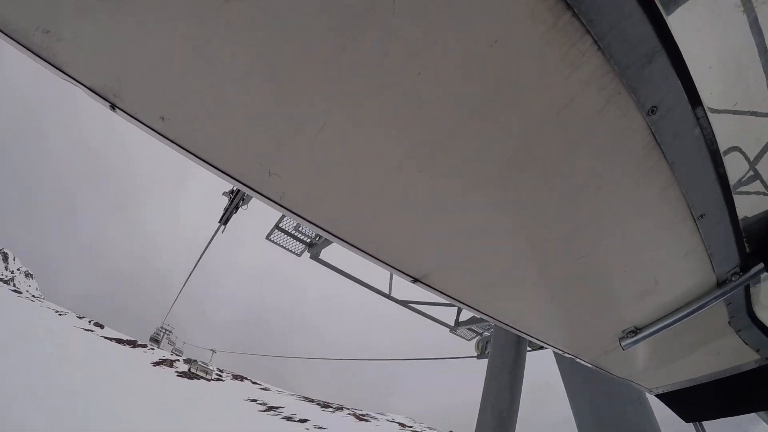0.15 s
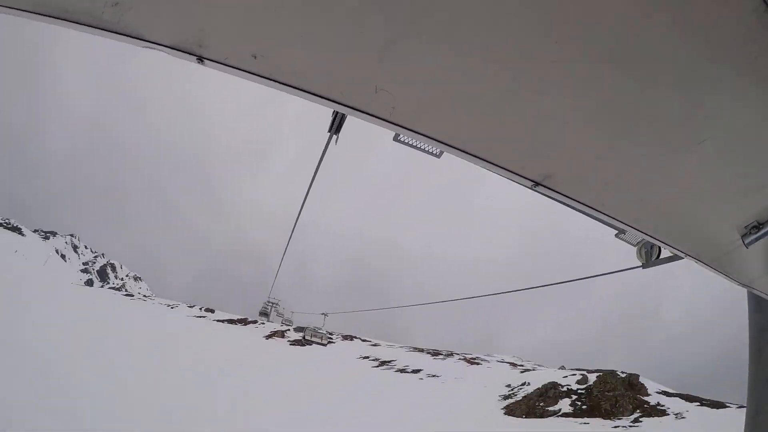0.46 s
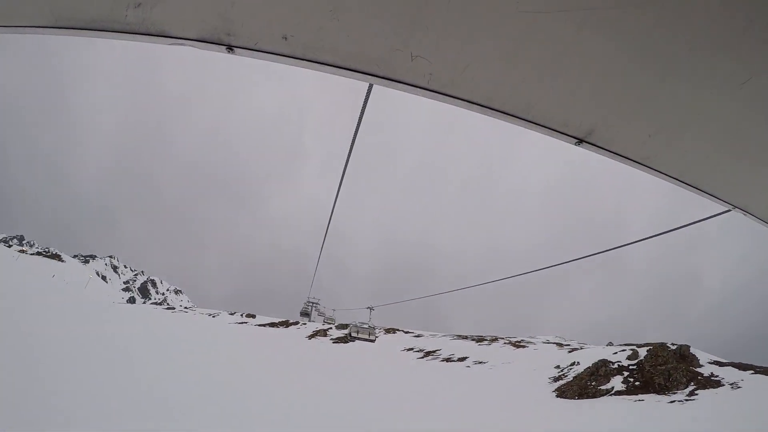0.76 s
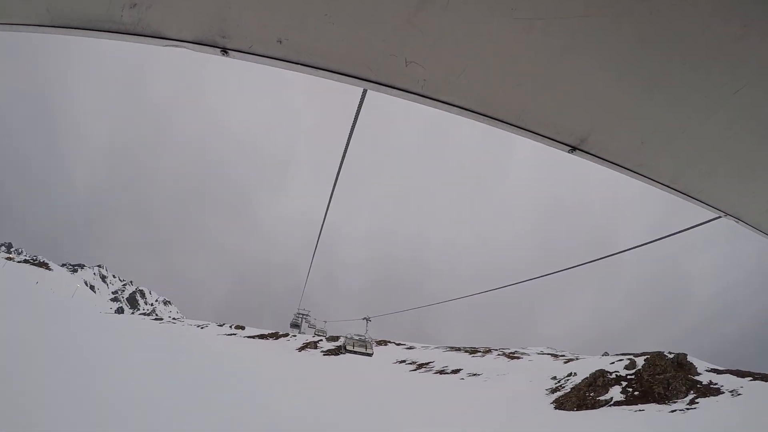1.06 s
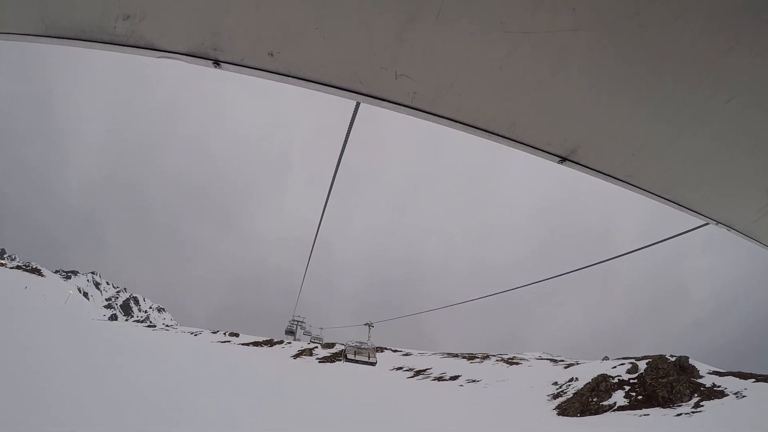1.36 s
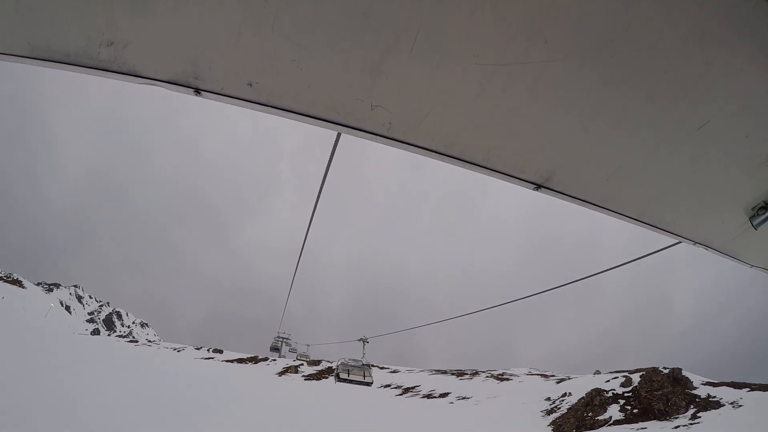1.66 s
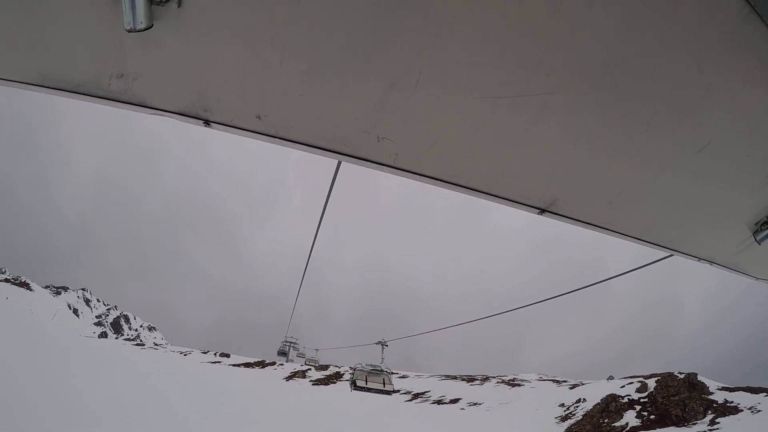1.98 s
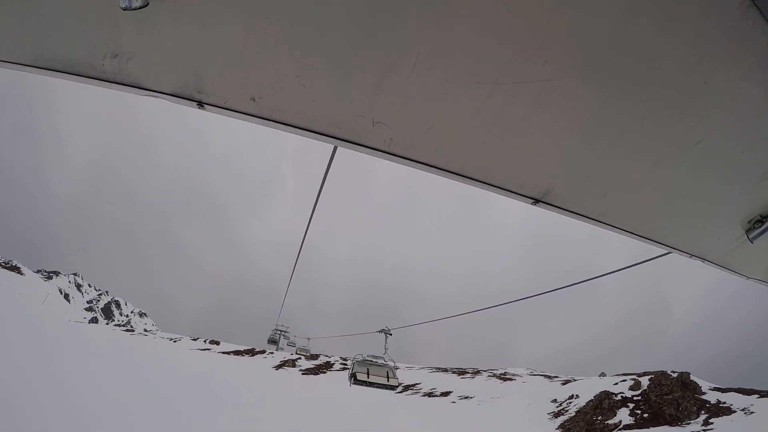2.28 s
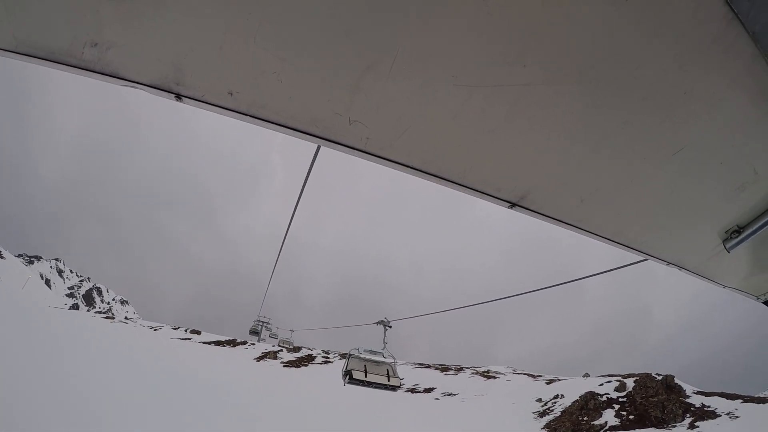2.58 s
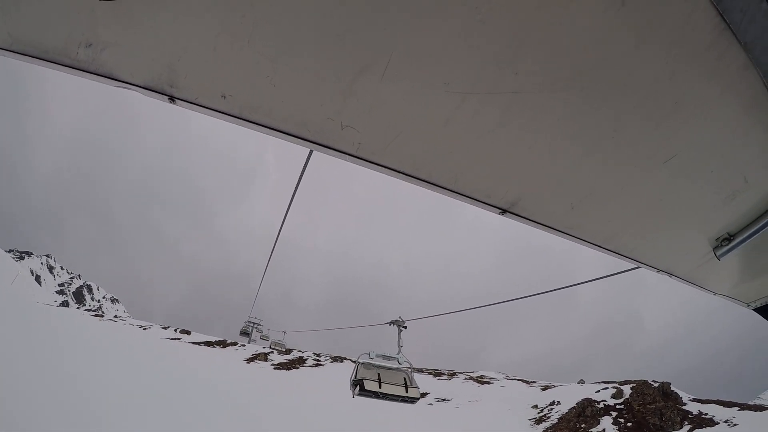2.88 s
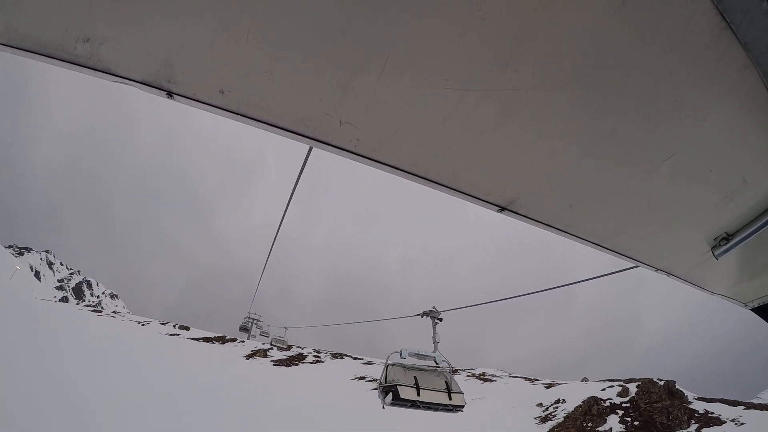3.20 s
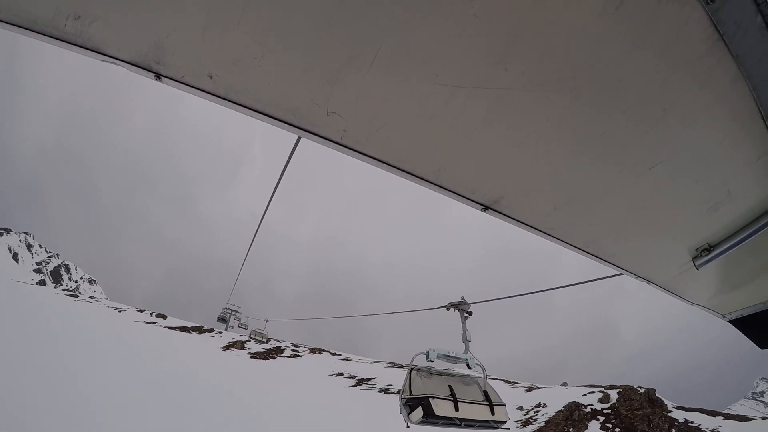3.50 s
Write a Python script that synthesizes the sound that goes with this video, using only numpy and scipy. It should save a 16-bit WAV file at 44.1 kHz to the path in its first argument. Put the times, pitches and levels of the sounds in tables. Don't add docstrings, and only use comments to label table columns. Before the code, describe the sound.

A chairlift chair rides over tower wheels with deep shuddering rumble, rapid metallic knocks and bright rattles, then calms to a low cable hum with faint squeaky taps; outdoors, small camera mounted on the chair.

```python
import sys
import numpy as np
from scipy import signal
from scipy.fft import rfft, irfft
from scipy.io import wavfile
from scipy.ndimage import uniform_filter1d

SR = 44100
rng = np.random.default_rng(int(sys.argv[2]) if len(sys.argv) > 2 else 0)


def ratio_of_db(decibels):
    return 10 ** (np.asarray(decibels, float) / 20)


def to_wav(sig):
    pcm = np.clip(np.atleast_2d(sig), -1, 1) * 32767
    pcm = np.round(pcm).astype(np.int16)
    wavfile.write(sys.argv[1], SR, pcm.T)


N = 160965


def evened(x):
    return x / np.sqrt(np.mean(x ** 2) + 1e-20)


def read(points, hz):
    f, value = np.transpose(points)
    return np.interp(np.log(hz + 1), np.log(f + 1), value)


def curve(rows, column):
    rows = np.array(rows)
    return np.interp(np.arange(N) / SR, rows[:, 0], rows[:, column])


def add(mix, s, sound):
    part = mix[..., round(s * SR):][..., :sound.shape[-1]]
    part += sound[..., :part.shape[-1]]


def colour(x, db_of):
    size = x.shape[-1]
    return irfft(rfft(x) * ratio_of_db(db_of(np.fft.rfftfreq(size, 1 / SR))), size)


def resonate(x, hz, width):
    turn = np.exp(2j * np.pi * hz * np.arange(x.shape[-1]) / SR)
    r = np.exp(-np.pi * width / SR)
    return 2 * (turn * signal.lfilter([1 - r], [1, -r], x / turn + 1e-18)).real


def drift(rate_hz):
    control_hz = 60
    count = int(N / SR * control_hz) + 2
    t = np.arange(count) / control_hz
    slow = sum(np.sin(2 * np.pi * (f * rate_hz * t + rng.random())) for f in np.geomspace(.1, 1, num=16))
    return np.interp(np.arange(N) / SR, t, evened(slow))


# t/s, level/dB
SHUDDER_LEVEL = [(0, -12.5), (.3, -13), (.48, -13.5), (.65, -13), (1.33, -15), (1.67, -20), (1.86, -14.5),
                 (1.94, -23.5), (2.05, -19.5), (2.32, -28), (2.48, -16), (2.62, -22.5), (2.74, -29),
                 (3.15, -25), (3.65, -29.5)]
# f/Hz, width/Hz, level/dB
SWING_MODES = [(22.5, 4.6, -5.5), (30.2, 3.95, 5), (41.83, 7.1, 0.5), (53.4, 5.9, -3), (65.14, 10.21, -6.5)]


def shudder():
    t = np.arange(N) / SR
    modes = 0
    for hz, width, db in SWING_MODES:
        strength = ratio_of_db(db + 5.3 * drift(7.0))
        wander = np.cumsum(1.4 * width * drift(14.0)) / SR
        modes = modes + strength * np.sin(2 * np.pi * (hz * t + wander))
    body = evened(np.tanh(0.4 * evened(modes)))
    loud = np.sqrt(uniform_filter1d(body ** 2, size=8000) + 0.23)
    return ratio_of_db(curve(SHUDDER_LEVEL, 1) + 2.06) * body / loud


# t/s, frame drone level/dB, fittings buzz level/dB
WHEEL_CONTACT = [(0, -24, -34.5), (.36, -25.5, -34), (.39, -28, -42), (.44, -30.5, -31), (.59, -24, -39.5),
                 (.64, -24.5, -29.5), (.8, -26, -36), (1.17, -26, -42), (1.25, -30.5, -44),
                 (1.355, -33, -53), (1.385, -41, -58), (1.72, -39, -58), (1.84, -33.5, -55),
                 (1.97, -47, -61), (2.6, -45, -59.5), (2.75, -53.5, -82), (3.37, -44.5, -60),
                 (3.65, -54, -74)]
# f/Hz, level/dB, t60/s
FRAME_MODES = [(114.7, -3, 0.29), (158, 1.5, 0.095), (200.6, -0.5, 0.28), (250, 0, 0.11), (272, -4.5, 0.2),
               (321.8, -4.5, 0.19), (356.4, -2.5, 0.11), (452.6, -3.5, 0.081), (540, -6, 0.095),
               (636, -3, 0.044), (817, -10, 0.06), (996, -9.5, 0.053), (1310, -11, 0.066)]
# t/s, peak level/dB, struck part f/Hz, brightness/dB per octave
FRAME_KNOCKS = [(0.02, -21, 250, -18), (0.069, -21, 570, -3), (0.093, -7.5, 246, 0.5),
                (0.134, -14.5, 220, -0.5), (0.185, -15, 393, -1), (0.238, -5.5, 272, -2.5),
                (0.27, -10.5, 317, -4.5), (0.313, -12.5, 257, 4), (0.36, -23, 536, 15),
                (0.468, -13.5, 334, 1), (0.525, -13, 333, -7), (0.594, -9, 266, -14), (0.643, -7, 269, 1),
                (0.683, -4.5, 279, 1), (0.731, -4.5, 327, -2.5), (0.774, -3.5, 326, -1),
                (0.821, -6, 344, -1), (0.866, -12, 272, 5.5), (0.909, -9, 342, 1), (0.952, -6.5, 358, 0),
                (1.007, -9.5, 337, -3.5), (1.061, -20.5, 300, -5), (1.1, -13, 255, 0),
                (1.135, -11.5, 302, 2), (1.175, -13.5, 320, 0), (1.309, -12.5, 290, -4.5),
                (1.354, -22, 262, -0.5), (1.412, -24.5, 224, 0), (1.455, -30, 604, 11), (1.53, -27, 345, 3),
                (1.61, -30, 605, 5), (1.766, -26, 331, 0), (1.789, -21, 535, -8), (1.792, -15.5, 201, -4),
                (1.83, -14, 510, -16), (1.831, -12, 129, -12), (1.852, -15.5, 202, -4),
                (1.876, -16, 200, -9), (1.897, -24.5, 224, 2.5), (1.915, -22, 128, -9),
                (2.02, -27.5, 540, -2), (2.061, -37, 540, -4), (2.163, -31.5, 650, 2.5),
                (2.208, -33, 800, -10), (2.398, -31.5, 537, -2), (2.58, -25.5, 287, 1),
                (2.622, -30.5, 300, 2), (3.33, -31.5, 400, 2), (3.384, -29.5, 390, 0)]


def frame():
    rough = rng.standard_normal((2, N)) * ratio_of_db(2.0 * drift(40.0))
    drone = 0
    for hz, db, t60 in FRAME_MODES:
        mode = resonate(resonate(rough, hz, 9.8 / t60), hz, 12.7 / t60)
        drone = drone + ratio_of_db(db) * mode * np.sqrt(t60)
    bed = colour(rough, lambda hz: -8.0 * np.log2(1 + hz / 300) - 5.0 * (hz / 6000) ** 2 - 40 * (hz < 70))
    out = (evened(drone) + 0.91 * evened(bed)) * ratio_of_db(curve(WHEEL_CONTACT, 1) - 2.0)

    t = np.arange(6000) / SR
    chance = rng.random((len(FRAME_KNOCKS), 2, len(FRAME_MODES)))
    for (s, peak_db, part_hz, bright_db), (share, phase) in zip(FRAME_KNOCKS, chance):
        ring = 0
        for (hz, db, t60), a, b in zip(FRAME_MODES, share, phase):
            below = -7.9 * np.log2(max(part_hz / hz, 1))
            above = bright_db * np.log2(max(hz / part_hz, 1))
            near = 6 * np.exp(-(hz / part_hz - 1) ** 2 / 0.033)
            decay = -60 * t / (0.65 * t60)
            level = ratio_of_db(db + 1.1 * a + below + above + near + decay)
            onset = 1 - np.exp(-t * hz / 1.15)
            ring = ring + level * onset * np.sin(2 * np.pi * (hz * t + 0.35 * b))
        add(out, s - .001, ratio_of_db(peak_db - 4.5) * ring / abs(ring).max())
    return out


# t/s, peak level/dB, ring f/Hz
RATTLE_BURSTS = [(0.072, -17, 6800), (0.186, -14, 2250), (0.208, -20, 6410), (0.2953, -17, 6900),
                 (0.3421, -11.5, 6330), (0.435, -13, 6040), (0.482, -13.5, 6380), (0.529, -15, 7000),
                 (0.618, -15, 6700), (0.651, -15, 4200), (0.695, -10.5, 5600), (0.7666, -11.5, 6950),
                 (0.785, -14, 2090), (0.855, -15.5, 2290), (1.0155, -14, 4260), (1.076, -19, 6170),
                 (1.1315, -18, 3590), (1.168, -20, 6760), (1.2765, -23.5, 2750), (1.317, -17, 2450),
                 (0.267, -39, 6400), (0.315, -26, 6600), (0.396, -23.5, 6500), (0.569, -21.5, 6400),
                 (0.905, -20, 6400), (0.933, -22, 6300), (0.982, -22.5, 6400), (1.046, -25, 6180),
                 (1.11, -18, 6680), (1.214, -27.5, 6400),
                 (1.337, -25.5, 6130), (1.7495, -14, 6300), (1.763, -32, 5770), (1.8444, -35, 2350),
                 (1.896, -42, 2160), (2.2085, -33, 3140), (2.33, -34.5, 6000), (2.5795, -40.5, 1930),
                 (2.976, -42, 2100), (3.3418, -41, 2940), (3.3865, -41, 2080)]
# t/s, peak level/dB
SHARP_SNAPS = [(0.0335, -11.5), (0.0427, -12.5), (0.1325, -12), (0.1403, -15), (0.452, -25), (0.462, -14),
               (0.7166, -18), (0.7271, -8.5), (1.1261, -7), (1.452, -39), (1.8407, -32), (2.156, -34),
               (2.278, -47), (2.4867, -38), (2.666, -34), (2.2103, -35), (2.3306, -37), (1.7491, -15)]
# f/Hz, level/dB per Hz
HOUSING_COLOUR = [(700, 0.5), (1300, -1.5), (2300, -4.5), (4600, -9.5), (6400, -3), (7700, -7.5),
                  (8600, -17.5), (15000, -45.5)]


def rattles():
    rise_s, hold_s, burst_t60, snap_t60 = 0.00076, 0.0085, 0.055, 0.024
    strength_db = 3.5 * np.repeat(np.minimum(rng.exponential(1, N // 48 + 1), 3), 48)[:N]
    impacts = ratio_of_db(strength_db) * rng.standard_normal((2, N))
    swarm = evened(colour(impacts, lambda hz: read(HOUSING_COLOUR, hz)))
    out = swarm * ratio_of_db(curve(WHEEL_CONTACT, 2) + 3.0 + 0.8 * drift(45.0))

    t = np.arange(6000) / SR
    shape = (1 - np.exp(-t / rise_s)) * ratio_of_db(-60 * np.maximum(t - hold_s, 0) / burst_t60)
    for s, peak_db, ring_hz in RATTLE_BURSTS:
        hits = np.roll(swarm, 9000 - round(s * SR), axis=1)[:, :len(t)]
        ring = 0
        for k in range(1, 1 + int(8000 / ring_hz)):
            ring = ring + resonate(resonate(hits, k * ring_hz, 600), k * ring_hz, 600)
        struck = evened(resonate(hits, ring_hz, 2800))
        hits = 0.88 * hits + 0.42 * struck + 0.58 * evened(ring)
        add(out, s - .002, ratio_of_db(peak_db - 13.0) * shape * hits)

    snap_shape = ratio_of_db(-60 * t / snap_t60) * (1 + 2.5 * np.exp(-t / 0.0009))
    for s, peak_db in SHARP_SNAPS:
        burst = rng.standard_normal((2, len(t))) * snap_shape
        burst = colour(burst, lambda hz: 0.83 * read(HOUSING_COLOUR, hz))
        add(out, s, ratio_of_db(peak_db) * burst / abs(burst).max())
    return out


# t/s, peak level/dB, upper mode f/Hz
CLIP_TAPS = [(1.528, -42, 1605), (2.035, -53, 1660), (2.059, -49.5, 1605), (2.93, -51, 1626),
             (2.462, -41.5, 1670), (2.4977, -44.5, 1640), (2.5411, -34, 1635), (2.5818, -37, 1636),
             (2.6257, -40.5, 1630), (2.672, -43.5, 1624), (3.0614, -48, 1689), (3.1454, -49, 1690),
             (3.193, -51.5, 1690), (3.2302, -50, 1697), (3.271, -43, 1663), (3.3127, -44, 1680),
             (3.3563, -47, 1645), (3.4374, -46, 1667), (3.482, -50, 1640), (3.6145, -45.5, 1660)]


def taps():
    low_hz, peak_s = 1540, .008
    t, out = np.arange(4000) / SR, np.zeros(N)
    shape = (t / peak_s * np.exp(1 - t / peak_s)) ** 1.9
    for (s, peak_db, top_hz), (share, a, b) in zip(CLIP_TAPS, rng.random((len(CLIP_TAPS), 3))):
        lower = (0.49 + 0.9 * share) * np.exp(-t / 0.016) * np.sin(2 * np.pi * (low_hz * t + a))
        upper = np.sin(2 * np.pi * (top_hz * t + b))
        add(out, s - .004, ratio_of_db(peak_db - 1.0) * shape * (lower + upper))
    return out


# t/s, f/Hz, level/dB, overtone level/dB
STRAND_HUM = [(0, 91, -58, -50), (1.3, 91.56, -50, -44), (1.6, 91.6, -35, -38.5), (2.0, 91.5, -33, -47.5),
              (2.13, 90.6, -32.5, -41.5), (2.4, 90.7, -33, -38), (2.45, 89.5, -37, -53),
              (2.62, 90.7, -35, -40.5), (2.94, 90.03, -32.5, -45), (3.26, 91.6, -31, -44),
              (3.65, 92.3, -32, -45)]


def hum():
    phase = 2 * np.pi * np.cumsum(curve(STRAND_HUM, 1) + .8 * drift(5.0)) / SR
    overtones = np.sin(2 * phase) + ratio_of_db(-24.0) * np.sin(3 * phase)
    low_level = ratio_of_db(curve(STRAND_HUM, 2) + 2.5 + 2.5 * drift(8.0))
    overtone_level = ratio_of_db(curve(STRAND_HUM, 3) + 1.5 + 3.3 * drift(5.3))
    return low_level * np.sin(phase) + overtone_level * overtones


# f/Hz, level/dB per Hz
AIR_COLOUR = [(70, -0.5), (130, -17), (260, -26), (1700, -37.5), (4500, -50), (6500, -45.5), (11000, -50.5),
              (15000, -70)]


def air():
    noise = rng.standard_normal((2, N)) * ratio_of_db(1.0 * drift(12.0))
    return ratio_of_db(-41.5 + 4.0) * evened(colour(noise, lambda hz: read(AIR_COLOUR, hz) - 40 * (hz < 60)))


# f/Hz, shared part/0..1
PORT_LIKENESS = [(60, 1), (300, 1), (700, 0.22), (1300, 0.23), (2800, 0.72), (8000, 0.55), (13000, 0.27)]
# f/Hz, level/dB
PORT_LEAN = [(40, -1), (150, 0), (350, 5.5), (700, 0), (1400, -2), (4000, 2), (9000, -2.5)]
# f/Hz, phase/rad
PORT_LEAD = [(60, 0.41), (300, 0.36), (700, 1.39), (1400, 1.58), (2500, 0.82), (5000, 0.79), (9000, 1.8),
             (13000, 1.5)]


def ports(pair):
    hz = np.fft.rfftfreq(N, 1 / SR)
    main, spare = rfft(pair)
    same = np.clip(read(PORT_LIKENESS, hz), 0, 1)
    half_lean = read(PORT_LEAN, hz) / 2
    left = main * np.exp(1j * read(PORT_LEAD, hz))
    right = same * main + np.sqrt(1 - same ** 2) * spare
    return irfft([left * ratio_of_db(half_lean), right * ratio_of_db(-half_lean)], N)


def scene():
    single = shudder() + hum()
    low = np.array([single, .5 * np.roll(single, 700)])
    return ports(frame() + rattles() + air() + taps() + low)


def low_pass(x):
    return signal.sosfilt(signal.butter(12, 15000, fs=SR, output="sos"), x)


def record(dry):
    rounded = 1.1 * np.tanh(dry / 1.1)
    return low_pass(rounded)


dry = scene()
out = record(dry)
to_wav(out)
```